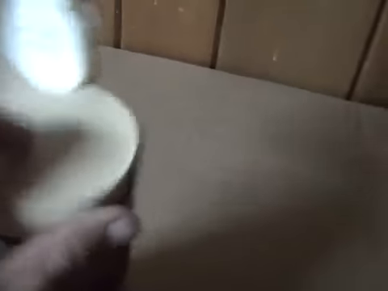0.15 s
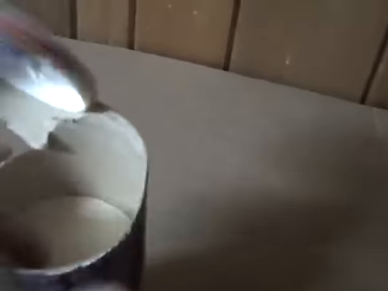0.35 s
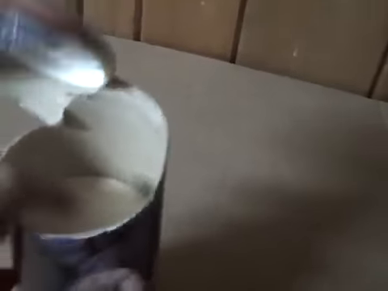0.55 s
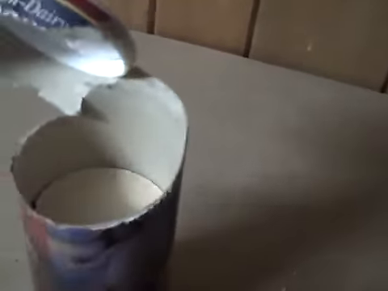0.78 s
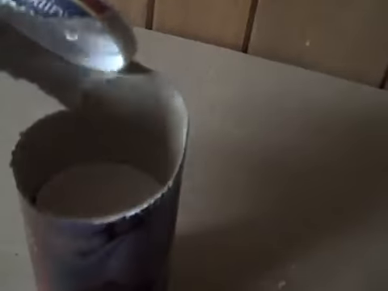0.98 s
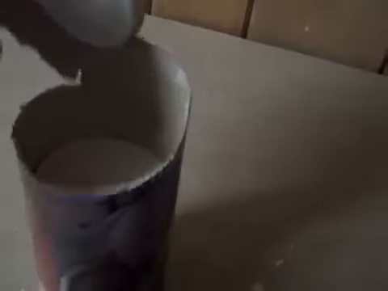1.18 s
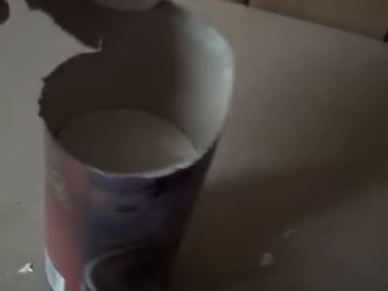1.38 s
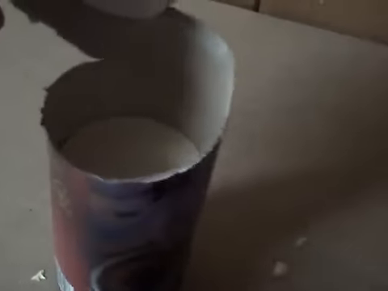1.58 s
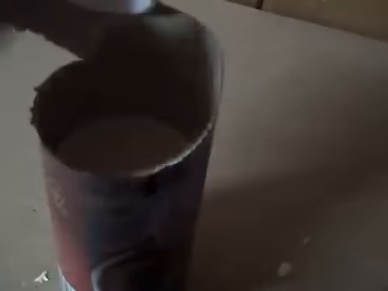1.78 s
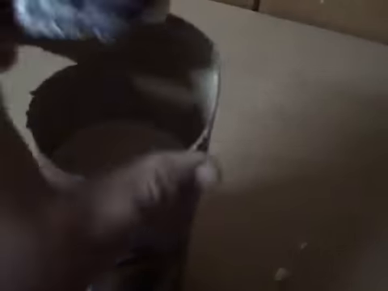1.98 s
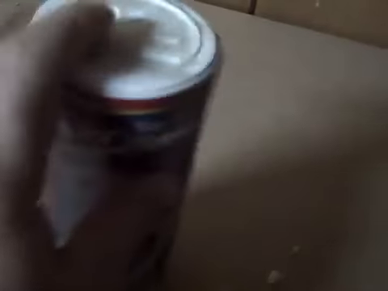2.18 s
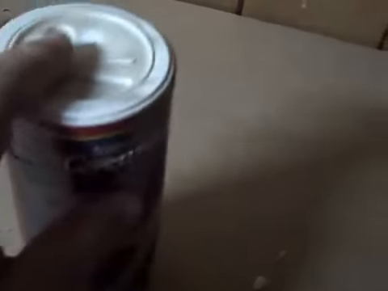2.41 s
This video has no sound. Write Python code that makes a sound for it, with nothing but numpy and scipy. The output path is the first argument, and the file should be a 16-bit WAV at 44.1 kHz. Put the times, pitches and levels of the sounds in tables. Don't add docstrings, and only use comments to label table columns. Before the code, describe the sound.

Close handheld microphone in a small quiet room: a powder block catches and slides roughly down a cardboard tube, knocks to a stop, then near silence with faint brushing, a nail tick, a soft table knock and late lid clicks.

```python
import sys
import numpy as np
from scipy import signal
from scipy.fft import rfft, irfft
from scipy.io import wavfile
from scipy.ndimage import uniform_filter1d

SR = 44100
rng = np.random.default_rng(int(sys.argv[2]) if len(sys.argv) > 2 else 0)


def magnitude_from_level(level_db):
    exponent = np.asarray(level_db, float) / 20
    return 10 ** exponent


def dump(signal):
    limited = np.clip(np.atleast_2d(signal).T, -1, 1)
    pcm = np.round(limited * 32767).astype(np.int16)
    wavfile.write(sys.argv[1], SR, pcm)


N = 108045

# start t/s, length/s, level/dB, brightness/dB, peak place/0-1
RUBS = [(0, 0.054, -54, -3, 0.06), (0.658, 0.094, -53.5, 1.5, 0.65), (0.756, 0.043, -63, 8, 0.4),
        (1.195, 0.022, -53.5, -4, 0.07), (1.203, 0.058, -54.5, -3.5, 0.4), (1.259, .01, -54, -2, 0.08),
        (1.27, 0.0046, -68, 11, 0.06), (1.28, 0.018, -47.5, -1.5, 0.12), (1.297, 0.068, -47, -2, 0.08),
        (1.3083, 0.0025, -41.5, 4.5, 0.35), (1.796, 0.0054, -63.5, 8, 0.33), (1.832, 0.011, -47.5, 1, 0.64),
        (1.893, 0.0083, -62, 4, 0.3), (1.802, 0.12, -50.5, -3, 0.46), (1.907, 0.13, -52.5, -4.5, 0.52),
        (1.82, 0.0073, -57, -6, .2), (1.746, 0.051, -61.5, -1, 0.43), (1.969, 0.012, -59, -4, .4),
        (2.031, 0.063, -56, -5.5, 0.3), (2.071, 0.094, -52, -1.5, 0.06), (2.145, 0.05, -58, 0, 0.23),
        (2.153, 0.44, -55, -3, 0.18), (2.251, 0.084, -41, -1, 0.45), (2.312, 0.063, -47.5, -1, 0.64),
        (2.358, .012, -46.5, -7, 0.4), (2.405, 0.014, -43.5, 2, 0), (.8, 0.013, -56, -5, 0.7)]
# f/Hz, level/dB per Hz
SKIN_SPECTRUM = [(240, -33), (400, -15.5), (643, -19), (886, -9.5), (1320, -9), (1450, -7.5), (4420, -5.5),
                 (10900, -1.5), (15500, -18)]
# f/Hz, level/dB per Hz
AIR_SPECTRUM = [(12, -52), (20, -1.5), (350, -12), (560, -5.5), (850, -12.5), (2100, -12.5), (5000, -23),
                (15500, -27.5)]
AIR_DB = -63.5
ROOM_T60_S, ROOM_DB, ROOM_LOWPASS_HZ = 0.3, -17.5, 4000

# t/s, peak level/dB, t60/s, brightness/dB
SLIPS = [(.072, -44, 0.042, 0.5), (.102, -48.5, 0.029, 2), (0.111, -39, 0.031, 0),
         (0.127, -46, 0.074, -3.5), (0.146, -40.5, 0.018, 0.5), (.154, -32.5, 0.034, -3),
         (.168, -43, 0.11, -4), (.184, -29.5, 0.027, -1), (0.194, -42.5, 0.037, -9), (.161, -37, 0.02, 0.5),
         (0.212, -37, .05, 2), (0.216, -28.5, 0.04, -1.5), (0.2198, -29, 0.046, -1.5),
         (0.2289, -22.5, 0.035, 1.5), (0.244, -31, 0.015, 5), (0.253, -31, 0.054, -7),
         (0.265, -31.5, .04, -6), (.056, -57, 0.042, 4), (.129, -47.5, 0.07, 1)]
# f/Hz, width/Hz, level/dB
WALL_MODES = [(1503, 313, 3), (1787, 233, 7), (2290, 120, 2.5), (3070, 300, -5), (3720, 235, 3),
              (4230, 640, -0.5), (7900, 1250, -3), (9720, 1820, -6)]
# f/Hz, width/Hz, level/dB
WALL_DIP = [(6220, 2650, -6.5)]
SLIP_WIDENING = 2.53
# start t/s, length/s, f/Hz, width/Hz, level/dB
SINGS = [(0.068, 0.0078, 4200, 400, -52.5), (0.098, 0.11, 300, 200, -63.5),
         (0.235, 0.039, 1686, 150, -31.5), (0.269, 0.11, 2290, 90, -32),
         (0.296, 0.053, 1560, 159, -29), (0.331, 0.047, 350, 200, -36.5),
         (0.333, 0.048, 3730, 706, -29), (0.34, 0.034, 2240, 302, -34),
         (0.525, 0.1, 8050, 5300, -43.5), (0.533, 0.11, 1920, 200, -49), (0.533, 0.1, 630, 740, -48),
         (0.536, 0.105, 122, 80, -52.5), (0.542, .08, 2800, 300, -50.5),
         (0.544, 0.014, 4940, 189, -42), (.607, 0.02, 3150, 800, -43.5),
         (0.633, 0.071, 343, 305, -56.5), (.65, 0.079, 130, 65, -60.5),
         (1.196, 0.0094, 4530, 295, -63), (1.307, 0.048, 313, 250, -65), (1.735, 0.059, 3260, 150, -67),
             (1.827, 0.087, 506, 500, -61.5), (1.968, 0.016, 1340, 200, -61),
             (1.971, 0.038, 3020, 500, -65), (2.074, 0.023, 4000, 298, -62.5),
             (2.077, 0.042, 3200, 400, -62.5), (2.15, .016, 1150, 200, -63), (2.189, .04, 2950, 300, -62.5),
             (2.255, 0.059, 4360, 1200, -51), (2.272, 0.021, 900, 69.6, -51),
             (2.335, 0.035, 710, 200, -56.5), (2.36, 0.012, 2500, 150, -55), (2.412, .038, 433, 120, -53.5)]

# t/s, pressure level/dB, wall ring/dB, hollow air/dB
SLIDE = [
    (0.158, -61, 6, 5),
    (0.218, -46, -3, -5),
    (0.298, -23.5, 0.5, -18),
    (0.366, -28.5, -26, -29.5),
    (0.378, -29.5, 1, -11.5),
    (0.429, -35.5, -36, -8),
    (0.462, -26, -27, -2),
    (0.486, -35.5, -28, -10.5),
    (0.529, -36.5, -25, -6),
]
# f/Hz, level/dB per Hz
GRIT_SPECTRUM = [(290, -22), (500, -7.5), (803, -14.5), (914, -5.5), (2570, -2), (2840, 0.5), (3100, -1),
                 (10500, -3.5), (15500, -15)]
# f/Hz, width/Hz, level/dB
HOLLOW_MODES = [(200, 82, -0.5), (300, 91, -1.5), (508, 124, -3), (1010, 420, -6)]
GRAINS_PER_S, GRAIN_SPREAD_DB, FLICKER_DB = 19000, 1.5, 2

# start t/s, length/s, level/dB
SWAYS = [
    (.25, 0.35, -44),
    (.83, 0.6, -52),
]
SWAY_TREMOR_HZ = 25

# t/s, peak level/dB, pitch factor, t60/s
THUDS = [
    (0.342, -30.5, 0.21, 0.066),
    (0.451, -22.5, 1.1, 0.053),
    (0.5209, -34.5, 0.44, 0.11),
    (2.3785, -31.5, 1.4, 0.02),
    (2.387, -38, 1.96, 0.063),
]
# f/Hz, level/dB, share of t60
THUD_MODES = [(211.4, 5, 0.97), (402, -1.5, 1.16), (125, -23, 0.77)]
# t/s, peak level/dB, pitch factor, t60/s
TAPS = [
    (0.4498, -21.5, 1.0, 0.024),
    (0.462, -17.5, 1.14, 0.012),
    (0.471, -46, 1.4, 0.013),
    (0.483, -36, 1.5, 0.011),
]
# f/Hz, level/dB
TAP_MODES = [(2040, -6), (2600, -1.5), (2950, -3), (3450, 0), (5300, -26), (7600, 3), (10200, 13.5)]
TAP_TREBLE_DAMPING = 0.6
TAP_CRACK_DULLNESS = 0.38

# f/Hz, level/dB, t60/s
CLACK_MODES = [(317, -12, 0.095), (2002, 0.5, 0.037), (2140, -14, .08), (2647, -9, .07), (2820, 0, 0.043),
               (3056, 2.5, 0.033), (3670, -8, 0.063), (5740, -13, .03), (7620, -6, 0.026)]
# f/Hz, level/dB, t60/s
RIM_MODES = [(1735, -2, 0.042), (2520, -3.5, 0.033), (2920, -2, 0.037), (3180, 1, 0.021), (4474, -6.5, .03),
             (5440, -16, .03), (7000, -18, .02)]
# f/Hz, level/dB, t60/s
TABLE_MODES = [(251, -9, 0.044), (489, 0, 0.039), (626, -10, .04), (863, 3.5, 0.021), (1033, -6, 0.032),
               (1830, -13, 0.027), (2560, -26, .015)]
# f/Hz, level/dB, t60/s
LID_MODES = [(414, -9.5, 0.097), (660, -6, .04), (1020, -4, 0.02), (1210, -11, .04), (1540, -3.5, .03),
             (1960, -4, 0.017), (2270, -0.5, 0.017), (2800, -8.5, 0.026), (3710, 1.5, 0.012),
             (5180, -4, 0.013), (6900, -6, 0.013), (9800, -5, 0.0072), (13200, -8, .006)]
# t/s, peak level/dB, rise/s, pitch factor
CLACKS = [
    (0.52, -18.5, 0.002, 1.0),
    (0.5413, -30.5, 0.00074, 0.96),
]
# t/s, peak level/dB, rise/s, pitch factor
RIM_TAPS = [
    (1.2894, -43, 0.00072, 1.1),
    (1.2917, -42.5, 0.00084, .98),
]
# t/s, peak level/dB, rise/s, pitch factor
TABLE_KNOCKS = [
    (1.8216, -33.5, .002, 0.98),
    (1.8359, -43.5, 0.0011, 0.6),
    (1.846, -44, 0.0032, 0.94),
    (1.9, -55, 0.0034, 1.13),
]
# t/s, peak level/dB, rise/s, pitch factor
LID_BOUNCES = [
    (2.4042, -33.5, 0.00025, 1.03),
    (2.4081, -41.5, 0.00028, 0.93),
    (2.411, -43.5, 0.00048, 1.03),
]
CRACK_DB = [-4, -4, -19, 1.5]
CRACK_T60_S = 0.014

EDGE_HZ, LEAK_DB = 15000, -40
DUCK_FROM_DB, DUCK_SHARE, RECOVER_DB_PER_S = -49, 0.15, 33


def evened(x):
    return x / np.sqrt(np.mean(x ** 2) + 1e-20)


def colour(x, spectrum):
    f_hz, level_db = np.transpose(spectrum)
    hz = np.fft.rfftfreq(len(x), 1 / SR)
    gain = magnitude_from_level(np.interp(np.log(hz + 1), np.log(f_hz + 1), level_db))
    return evened(irfft(rfft(x) * gain, len(x)))


def add(mix, start_s, sound):
    part = mix[max(round(start_s * SR), 0):][:len(sound)]
    part += sound[:len(part)]


def body(x, modes):
    out = 0
    for k, (hz, width_hz, db) in enumerate(modes):
        b, a = signal.iirpeak(hz, hz / width_hz, SR)
        out = out + (-1) ** k * magnitude_from_level(db) * signal.lfilter(b, a, x)
    return out


def brighten(x, db):
    low = signal.sosfilt(signal.butter(2, 5000, fs=SR, output="sos"), x)
    return magnitude_from_level(db) * (x - low) + magnitude_from_level(-db) * low


def grit(grains_per_s, spread_db, flicker_db):
    size = magnitude_from_level(spread_db * np.minimum(rng.exponential(1, N), 3))
    grains = size * (rng.random(N) < grains_per_s / SR) * rng.standard_normal(N)
    smooth = uniform_filter1d(rng.standard_normal(N), size=120)
    clumps = evened(uniform_filter1d(smooth, size=120))
    return evened(grains * magnitude_from_level(flicker_db * clumps))


def rubs():
    skin = colour(grit(18000, 1.2, 1.8), SKIN_SPECTRUM)
    out = np.zeros(N)
    for start_s, length_s, db, bright_db, peak in RUBS:
        u = np.arange(round(length_s * SR)) / (length_s * SR)
        swell = np.interp(u, [0, np.clip(peak, 0.02, 0.98), 1], [0, 1, 0]) ** 1.2
        a = max(round(start_s * SR), 0)
        piece = skin[a:a + len(u)]
        add(out, start_s, magnitude_from_level(db - 1.5) * brighten(piece * swell[:len(piece)], bright_db))
    return out


def air():
    return magnitude_from_level(AIR_DB) * colour(rng.standard_normal(N), AIR_SPECTRUM)


def room(x):
    t = np.arange(SR // 2) / SR
    tail = rng.standard_normal(len(t)) * magnitude_from_level(-60 * t / ROOM_T60_S) * (t > 0.004)
    tail = signal.lfilter(*signal.butter(1, ROOM_LOWPASS_HZ, fs=SR), tail)
    return magnitude_from_level(ROOM_DB) * signal.fftconvolve(x, tail / np.linalg.norm(tail))[:N]


def slips():
    t, out = np.arange(2600) / SR, np.zeros(N)
    wide_wall = [(hz, width_hz * SLIP_WIDENING, db) for hz, width_hz, db in WALL_MODES]
    for start_s, db, t60_s, bright_db in SLIPS:
        snap = magnitude_from_level(8.0 - 60 * t / 0.0013)
        burst = rng.standard_normal(len(t)) * (magnitude_from_level(-60 * t / t60_s) + snap)
        burst = burst - body(burst, WALL_DIP)
        sound = magnitude_from_level(10.5) * body(burst, wide_wall) + magnitude_from_level(-17.0) * burst
        add(out, start_s, magnitude_from_level(db - 4.5) * brighten(sound, bright_db))
    return out


def sings():
    grains, out = grit(12000, 2.5, 1.2), np.zeros(N)
    for start_s, length_s, hz, width_hz, db in SINGS:
        a, n = round(start_s * SR), round(length_s * SR)
        tone = body(grains[a:a + n], [(hz, width_hz, 0)])
        tone = body(tone, [(hz, min(2 * width_hz, 12000), 0)])
        add(out, start_s, magnitude_from_level(db) * np.hanning(n) ** 0.26 * evened(tone))
    return out


def slide():
    t = np.arange(N) / SR
    s, *levels_db = np.transpose(SLIDE)
    pressure, ring, hollow = [magnitude_from_level(np.interp(t, s, db)) for db in levels_db]
    fade_in = np.clip((t - s[0]) / 0.061, 0, 1)
    fade_out = np.clip((s[-1] + 0.015 - t) / 0.012, 0, 1)
    grains = grit(GRAINS_PER_S, GRAIN_SPREAD_DB, FLICKER_DB)
    direct = colour(grains, GRIT_SPECTRUM)
    direct = direct - np.clip(0.2 + ring, 0, 1) * body(direct, WALL_DIP)
    direct = magnitude_from_level(4.5) * direct / np.sqrt(1 + 1.46 * ring ** 2)
    high_modes = WALL_MODES[5:]
    high_wall = magnitude_from_level(-9.5) * evened(body(body(grains, high_modes), high_modes))
    wall = magnitude_from_level(-3.5) * evened(body(body(grains, WALL_MODES), WALL_MODES))
    tube_air = evened(body(rng.standard_normal(N), HOLLOW_MODES))
    return fade_in * fade_out * pressure * (direct + ring * (high_wall + wall) + hollow * tube_air)


def sway():
    lowpass = signal.butter(2, SWAY_TREMOR_HZ, fs=SR, output="sos")
    tremor = evened(signal.sosfilt(lowpass, rng.standard_normal(N)))
    out = np.zeros(N)
    for start_s, length_s, db in SWAYS:
        add(out, start_s, magnitude_from_level(db) * np.hanning(round(length_s * SR)) ** 0.5)
    return (1 + 0.24 * tremor) * out


def thuds():
    t, out = np.arange(6000) / SR, np.zeros(N)
    for start_s, db, pitch, t60_s in THUDS:
        ring = sum(magnitude_from_level(mode_db - 60 * t / (t60_s * share)) * np.sin(2 * np.pi * hz * pitch * t)
                   for hz, mode_db, share in THUD_MODES)
        add(out, start_s, magnitude_from_level(db - 10.5) * np.minimum(t / 0.002, 1) * ring)
    return out


def taps():
    t, out = np.arange(6000) / SR, np.zeros(N)
    for start_s, db, pitch, t60_s in TAPS:
        noise = rng.standard_normal(len(t))
        ring = 0
        for k, (hz, mode_db) in enumerate(TAP_MODES):
            decay_db = 60 * t / t60_s * (hz / 2500) ** TAP_TREBLE_DAMPING
            ring = ring + magnitude_from_level(mode_db - decay_db) * np.sin(2 * np.pi * hz * pitch * t + 3 * noise[k])
        crack = signal.lfilter([0.5, 0.5], [1, -TAP_CRACK_DULLNESS], noise)
        crack = magnitude_from_level(-9.5 - 60 * t / 0.052) * crack
        add(out, start_s, magnitude_from_level(db - 5) * np.minimum(t / 0.0014, 1) * (ring + crack))
    return out


def strikes():
    t, out = np.arange(6000) / SR, np.zeros(N)
    objects = (CLACK_MODES, RIM_MODES, TABLE_MODES, LID_MODES)
    blows_on_each = (CLACKS, RIM_TAPS, TABLE_KNOCKS, LID_BOUNCES)
    for modes, blows, crack_db in zip(objects, blows_on_each, CRACK_DB):
        for start_s, db, rise_s, pitch in blows:
            phases = 2 * np.pi * rng.random(len(modes))
            ring = sum(magnitude_from_level(mode_db - 60 * t / t60_s) * np.sin(2 * np.pi * hz * pitch * t + phase)
                       for (hz, mode_db, t60_s), phase in zip(modes, phases))
            crack = magnitude_from_level(crack_db - 60 * t / CRACK_T60_S) * rng.standard_normal(len(t))
            add(out, start_s, magnitude_from_level(db) * (np.minimum(t / rise_s, 1) * ring + crack))
    return out


def scene():
    near = rubs() + slips() + sings() + slide() + thuds() + taps() + strikes()
    return (near + room(near) + sway() + air())[None]


def low_pass(x):
    return signal.sosfilt(signal.butter(12, 16200, fs=SR, output="sos"), x)


def record(dry):
    power = uniform_filter1d(np.diff(dry[0], prepend=0) ** 2, size=800)
    power_db = 10 * np.log10(abs(power) + 1e-12)
    fall_db = np.arange(N) * RECOVER_DB_PER_S / SR
    held_db = np.maximum.accumulate(power_db + fall_db) - fall_db
    over_db = np.maximum(held_db - DUCK_FROM_DB, 0)
    x = dry / magnitude_from_level(DUCK_SHARE * uniform_filter1d(over_db, size=400))
    lowpass = signal.firwin(201, EDGE_HZ, window=("kaiser", 6), fs=SR)
    cut = signal.oaconvolve(x, lowpass[None], "same")
    return low_pass(cut + magnitude_from_level(LEAK_DB) * (x - cut))


dry = scene()
out = record(dry)
dump(out)
```